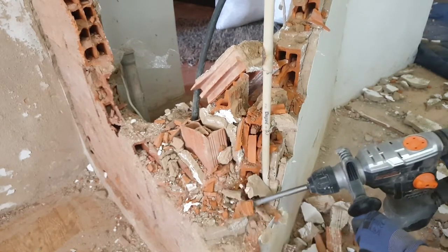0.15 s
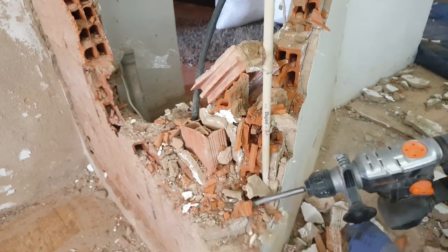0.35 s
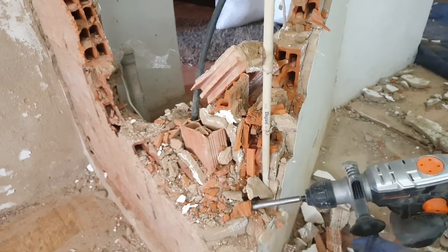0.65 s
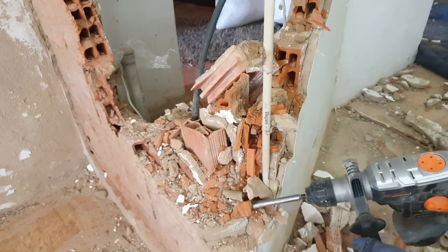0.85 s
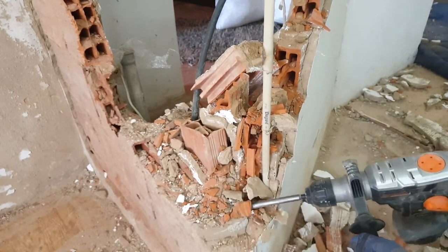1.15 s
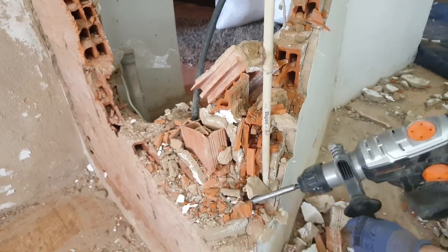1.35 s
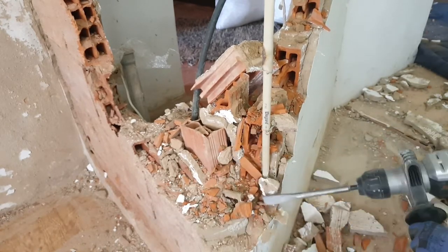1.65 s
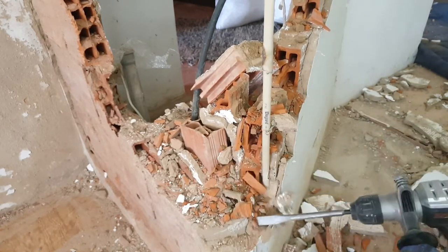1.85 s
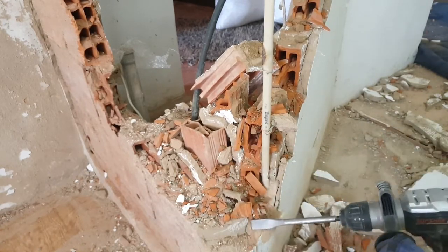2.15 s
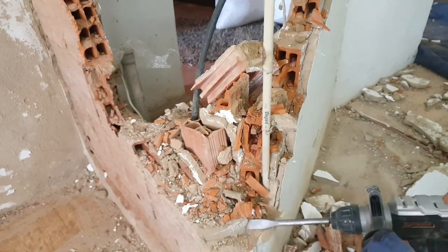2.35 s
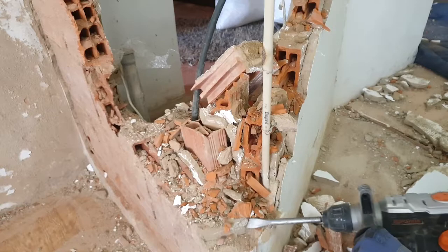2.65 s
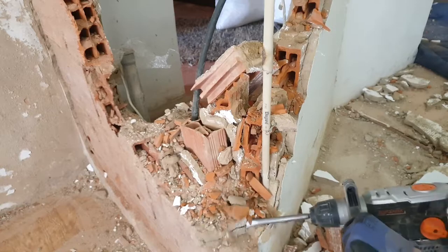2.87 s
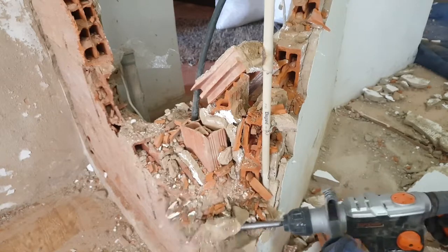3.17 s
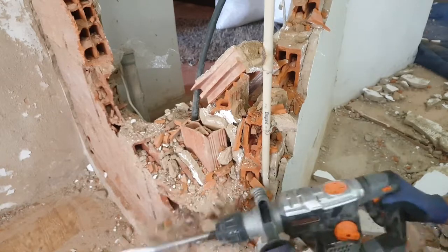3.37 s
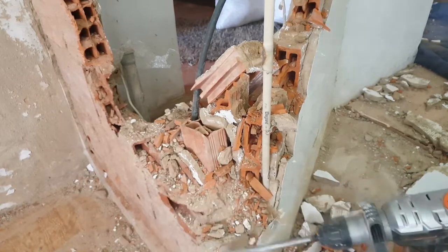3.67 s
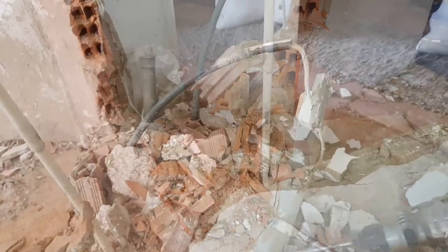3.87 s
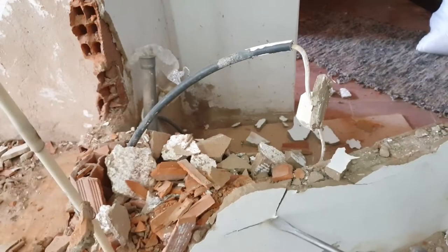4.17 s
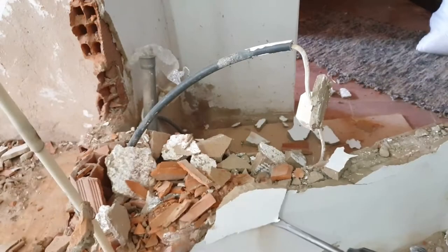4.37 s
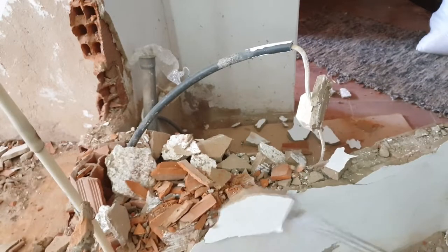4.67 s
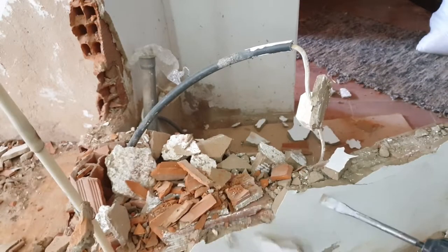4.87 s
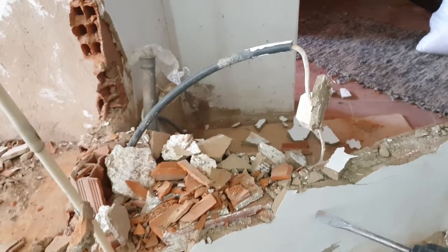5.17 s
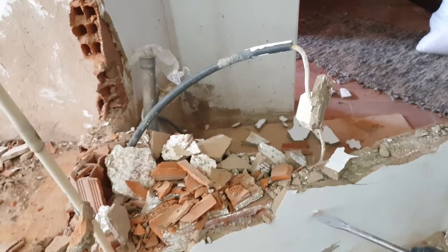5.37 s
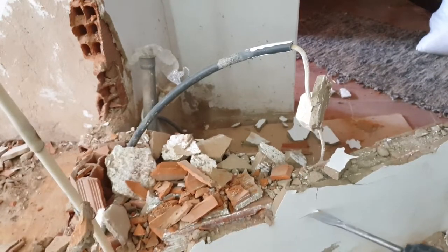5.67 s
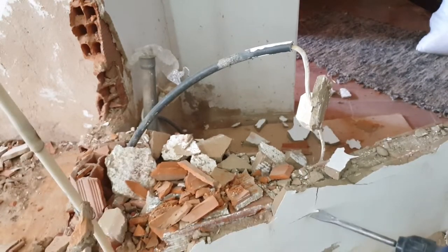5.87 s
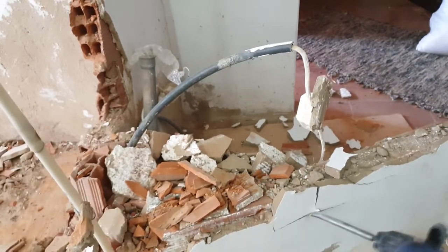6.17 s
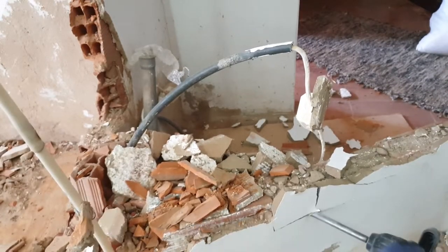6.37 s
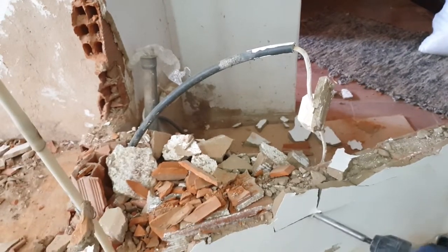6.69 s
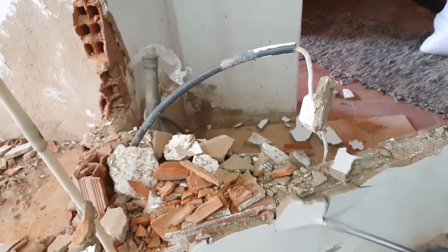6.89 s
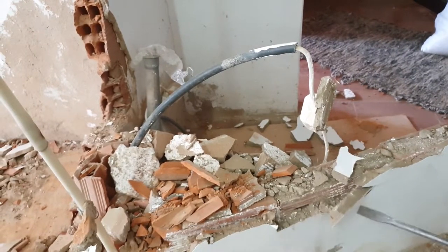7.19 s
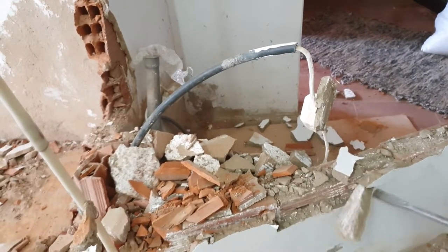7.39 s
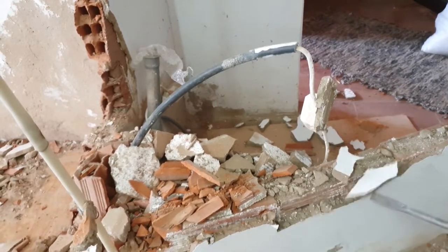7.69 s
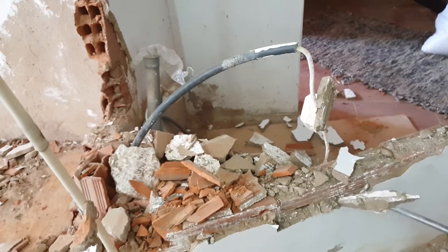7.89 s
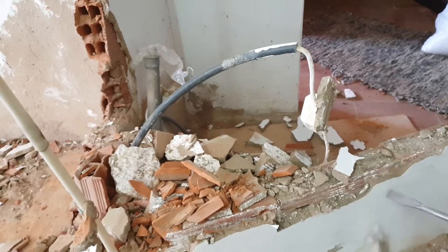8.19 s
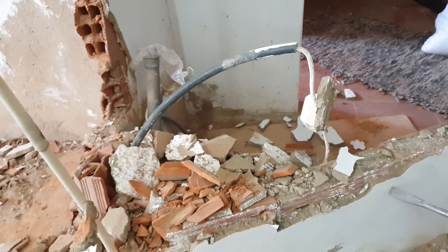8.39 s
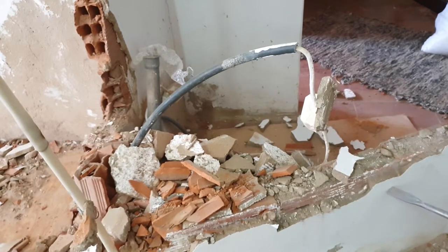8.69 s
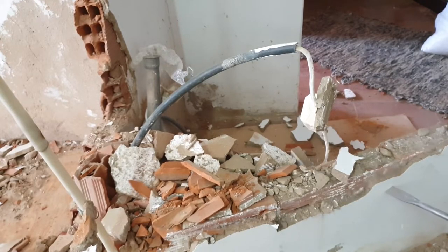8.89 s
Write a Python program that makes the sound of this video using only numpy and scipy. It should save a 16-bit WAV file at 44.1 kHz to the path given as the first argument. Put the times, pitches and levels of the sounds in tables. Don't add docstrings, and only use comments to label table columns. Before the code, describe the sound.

An electric rotary hammer with a steel chisel batters a hollow brick wall in separate bursts: fast metallic cracks, boxy wall boom and gritty crunch over a piercing motor whine and fan rush. Between bursts the whine slides down and loose pieces clack and crumble. Bare indoor room with short reverberation; close small stereo microphone, tool louder and brighter on the right.

```python
import sys
import numpy as np
from scipy import signal
from scipy.fft import rfft, irfft, next_fast_len
from scipy.io import wavfile
from scipy.ndimage import uniform_filter1d

SR = 44100
rng = np.random.default_rng(int(sys.argv[2]) if len(sys.argv) > 2 else 0)


def natural_amplitude(level_db):
    exponent = np.asarray(level_db, float) / 20
    return 10 ** exponent


def digitize_waveform(pressure):
    field = np.atleast_2d(pressure).T
    bounded = np.clip(field, -1, 1)
    quanta = np.round(bounded * 32767).astype(np.int16)
    wavfile.write(sys.argv[1], SR, quanta)


N = 398656

FULL_HZ, REST_HZ = 9850, 300

# on in s, off in s, full-speed whine in Hz, spin-up time constant in s,
# time the bit stays loaded after release in s.
PULLS = [
    (-.395, .521, 9833, .195, .124),
    (1.086, 1.544, 10819, .13, 0),
    (2.257, 3.003, 9891, .127, .189),
    (3.841, 4.353, 9828, .113, .105),
    (5.224, 6.239, 9849, .129, .143),
    (6.489, 6.714, 9410, .081, .047),
    (8.476, 9.2, 9800, .111, 0),
]
# time in s, seating on solid wall in dB, crushing of brick in dB.
BITE = [
    [(0, 0.5, 0.5), (.14, -0.5, -1.8), (.316, -1, 0.8), (.404, -9, -3.5), (.606, -3.5, -3.5),
     (.7, -13, -5.5)],
    [(2.375, 10, -14), (2.429, -15, 4.5), (2.729, 11, 0.5), (2.851, 4, -6.5), (2.985, -35, -3.5),
     (3.103, -5, .4), (3.2, -12, .4)],
    [(3.91, 6, -2.5), (3.968, -2, 6.5), (4.15, 3.5, 2), (4.226, -9.5, -6), (4.41, -1.5, 1.5),
     (4.52, 3.5, -21)],
    [(5.39, 1, 2), (5.46, -5, 4.5), (5.51, -.4, 6), (5.87, 4.5, -2.5), (6.316, -1.5, -2.5),
     (6.48, -0.5, -5.5), (6.624, 4, -1.3), (6.66, 1, -1.5), (6.72, -3, -7)],
    [(8.555, 8.5, 1), (8.721, -2, 1.5), (8.893, -3.5, -2), (9.04, 2, -1)],
]
# time in s, steel in dB, brick in dB.
SLOW = [(2.1949, -7, -28.5), (2.227, -4, -25.5), (2.2586, -6.5, -22), (2.2936, -12.5, -34),
        (2.321, -6, -23.5), (2.3434, -9.5, -34), (2.366, -12, -19.5), (3.23, -8, -41), (3.255, -8, -21.5),
        (3.3374, -27, -42), (3.8407, -22, -29), (3.8893, -8, -20), (5.2168, -12, -31), (5.271, -20, -25),
        (5.3088, -7, -22.5), (5.3322, -7, -18), (5.3568, -7.5, -16.5), (5.3792, -2, -15.5),
        (8.4766, -49, -52), (8.503, -30, -28.5), (8.54, -3, -15.5)]
# start in s, then change of the full-speed whine in dB.
LATER_PART = (3.85, -4)


def colour(x, points):
    hz, db = np.transpose(points)
    size = next_fast_len(x.shape[-1])
    f = np.maximum(np.arange(size // 2 + 1) * SR / size, 1)
    gain = natural_amplitude(np.interp(np.log(f), np.log(hz), db))
    return irfft(rfft(x, size) * gain, size)[..., :x.shape[-1]]


def unit(x):
    return x / np.sqrt(np.mean(x ** 2))


def noise():
    return rng.standard_normal(N)


def band(x, lo_hz, hi_hz):
    return signal.sosfilt(signal.butter(2, [lo_hz, hi_hz], "bandpass", fs=SR, output="sos"), x)


def train(s, size):
    out = np.zeros(N)
    np.add.at(out, np.clip((np.asarray(s) * SR).astype(int), 0, N - 1), size)
    return out


def fade(x, t60):
    return signal.lfilter([1], [1, -np.exp(-np.log(1000) / (t60 * SR))], x)


def ring(x, hz, t60):
    pole = np.exp(2j * np.pi * hz / SR - np.log(1000) / (t60 * SR))
    return signal.lfilter([0, pole.imag], [1, -2 * pole.real, abs(pole) ** 2], x)


def body(s, db, modes, scatter_db, rough=0):
    mix = rng.standard_normal((len(s), len(modes)))
    out = 0
    for k, (hz, mode_db, t60) in enumerate(modes):
        push = train(s, natural_amplitude(db + mode_db + scatter_db * mix[:, k]))
        if rough:
            push = fade(push, rough) * noise()
        out = out + ring(push, hz, t60)
    return out


def walk(rate):
    k = int(SR / rate)
    return unit(uniform_filter1d(uniform_filter1d(noise(), k), k))


def shifting(x, t60, rate, gap=0, count=3):
    t = np.arange(int(1.2 * t60 * SR)) / SR
    tails = rng.standard_normal((count, len(t))) * natural_amplitude(-60 * t / t60) * (t >= gap)
    share = np.array([walk(rate) for _ in tails])
    share = share / np.sqrt((share ** 2).sum(axis=0) * (tails ** 2).sum() / count)
    paths = signal.oaconvolve(x[None], tails, axes=1)[:, :N]
    return (share * paths).sum(axis=0)


def working():
    t = np.arange(N) / SR
    return sum(1. * (t >= bite[0][0]) * (t <= bite[-1][0]) for bite in BITE)


def later():
    return 1. * (np.arange(N) / SR > LATER_PART[0])


def noise_floor():
    # frequency in Hz, spectrum level in dB.
    floor_colour = [(59, -34), (100, 10), (277, 17), (970, -7), (1200, -2), (1720, 7), (3700, 6.5),
                    (16000, -44)]
    return unit(colour(rng.standard_normal((2, N)), floor_colour)) * natural_amplitude(-54)


def camera_shake():
    memory_s = 1.5
    recent_work = fade(working(), memory_s) * np.log(1000) / (memory_s * SR)
    level_db = -60.5 + recent_work * (8.5 + 9 * later())
    return natural_amplitude(level_db) * unit(band(noise(), 50, 109))


def air_puff():
    puff = (-8, 58, .1)
    return natural_amplitude(puff[0]) * ring(train([2.365], 1), *puff[1:])


def room(source):
    dull = natural_amplitude(-5.5) * colour(source, [(80, 0.5), (500, 5.5), (3000, -3), (16000, 1.5)])
    return [shifting(dull, .57, rate=2.56, gap=0.0044, count=2) for _ in "lr"]


def debris():
    # time in s, peak in dB, pitch in Hz, bright part in dB, t60 in s.
    pieces = [(3.121, -16, 341, -13, 0.051), (3.492, -24, 1640, -5, 0.15), (3.527, -13, 1430, -9, 0.03),
              (4.755, -25.5, 564, -15, 0.022), (4.997, -26.5, 2200, -7, 0.08),
              (5.005, -26.5, 312, -18, 0.025), (5.059, -33.5, 543, -14, 0.11),
              (5.11, -18.5, 560, -34, 0.08), (7.286, -21.5, 465, -27, 0.039), (7.361, -28, 780, -17, 0.058),
              (7.463, -56, 746, -8, 0.08), (7.631, -37, 633, -19, 0.15), (7.654, -32.5, 560, -20, 0.086),
              (7.708, -21, 764, -25, 0.046), (7.716, -19, 740, -14, 0.05), (8.309, -23.5, 642, -22, 0.18),
              (8.321, -20.5, 670, -13, 0.044), (8.388, -18, 320, -13, 0.023)]
    # time in s, level in dB.
    taps = [
        (7.361, -61),
        (7.716, -60),
        (8.309, -57),
        (8.387, -63),
    ]
    # frequency in Hz, level in dB, t60 in s.
    free_chisel = [(4000, -1, .13), (4450, -5, .05), (6100, -13, .1), (2150, -2, .05), (1500, -4, .06)]
    s, db, hz, bright_db, t60 = np.transpose(pieces)
    out = fade(train(s, natural_amplitude(db + bright_db + 3)), 0.013) * band(noise(), 2500, 13000)
    out += fade(train(s, natural_amplitude(db + 11.0)), 0.021) * band(noise(), 292, 2010)
    crumbs = band(noise() * natural_amplitude(4.0 * walk(150)), 200, 1100)
    out += fade(train(s, natural_amplitude(db - 13)), .35) * crumbs
    t = np.arange(4000) / SR
    for start, peak_db, pitch, decay_s in zip((s * SR).astype(int), db, hz, t60):
        for k, part_db in [(1, 3), (1.5, -3), (2.3, -6.5)]:
            decay_db = -60 * k * pitch / 320 * t / decay_s
            out[start:start + len(t)] += natural_amplitude(part_db + peak_db + decay_db) * np.sin(2 * np.pi * k * pitch * t)
    return out + body(*np.transpose(taps), free_chisel, scatter_db=1, rough=0.042)


def speed():
    friction, load, coast_s = 2324, 6823, 1.192
    t, hz, now = np.arange(N) / SR, np.zeros(N), 9000
    stages = []  # (start s, goal Hz, time constant s)
    for on, off, top, rise, loaded in PULLS:
        stages += [(on, top, rise), (off, -(friction + load) * coast_s, coast_s),
                   (off + loaded, -friction * coast_s, coast_s)]
    for (start, goal, lag), (end, *_) in zip(stages, stages[1:] + stages[-1:]):
        span = slice(*np.searchsorted(t, [start, end]))
        hz[span] = goal + (now - goal) * np.exp((start - t[span]) / lag)
        now = max(goal + (now - goal) * np.exp((start - end) / lag), REST_HZ)
    return np.maximum(hz, REST_HZ)


def motor_db(hz):
    facing_db = [-1, .6, -1, -2.5, -3.5, -4, -1]
    t, share = np.arange(N) / SR, hz / FULL_HZ
    pull = np.searchsorted(np.array(PULLS)[:, 0], t) - 1
    powered = t < np.array(PULLS)[pull, 1]
    spark_db = 14 * powered * np.clip(1 - share, 0, 1) ** 2
    extra_db = 2.5 * working() + np.array(facing_db)[pull] + spark_db
    fan = natural_amplitude(-28.5 + 34 * np.log10(share) + uniform_filter1d(extra_db, size=400))
    scrape = natural_amplitude(-52) * np.clip((hz - REST_HZ) / 900, .1, 1)
    return 20 * np.log10(np.hypot(fan, scrape))


def fan_air(bars, hz):
    # frequency in Hz, spectrum level in dB.
    air_colour = [(59, -78), (100, -46), (224, -24), (260, -10), (433, -10), (524, -5.5), (648, -6),
                  (2520, -1.5), (8640, -4.5), (10500, -18.5), (16000, -8)]
    air = unit(colour(noise(), air_colour)) * (1 + 0.12 * np.sin(2 * np.pi * bars / 24))
    jet_db = -22.5 + 23.9 * hz / 10000 - 6 * later()
    return air + band(noise(), 8500, 16000) * natural_amplitude(jet_db)


def commutator_whine(bars, hz):
    # multiple of the bar rate, level in dB.
    overtones = [(1.83, -13), (2.75, -14), (3.67, -15), (4.6, -17)]
    # bar rate in Hz, whine over the air in dB.
    radiation = [(1500, -11), (3000, -8), (4500, -7), (6800, -6), (8600, -3), (9800, -2), (10700, -1)]
    slope = np.gradient(hz) * SR
    coasting = uniform_filter1d(1. * (slope < -2500), size=2000)
    hard_start = uniform_filter1d(1. * (slope > 12000), size=2000)
    waver = walk(170)
    brush = 0
    for k, db in overtones:
        level = natural_amplitude(db + 5 * (hz < 2600) + 1.6 * walk(15))
        brush = brush + level * np.sin(k * (2 * np.pi * bars + .3 * waver)) * (k * hz < 9000)
    facing_db = LATER_PART[1] * later() * (hz > 9500) - 4 * hard_start
    whine_db = np.interp(hz, *np.transpose(radiation)) + facing_db + (1.8 + 1.0 * coasting) * walk(30)
    return brush + natural_amplitude(whine_db) * np.sin(2 * np.pi * bars + (.6 + .9 * coasting) * waver)


def motor(bars):
    hz = np.gradient(bars) * SR
    level = natural_amplitude(motor_db(hz) + 4.5 + 0.93 * walk(7.4))
    return level * (fan_air(bars, hz) + commutator_whine(bars, hz))


def blows(bars):
    # phase offset of the blows in turns, then steel, wall, crunch and thud in dB.
    bursts = [
        (.26, -21.5, -19, -28, -27),
        (.38, -19, -25, -31.5, -32.5),
        (.29, -17.5, -31.5, -26, -28.5),
        (-.18, -19.5, -34.5, -28, -30.5),
        (.31, -18.5, -31.5, -25, -24.5),
    ]
    seat_share = [0.02, 0.24, 0, 1]
    crush_share = [0.36, 0.67, 0.98, 0]
    slow_mix_db = [-2.5, -10.5, 0.5, -8]
    run_mix_db = [8.76, 5.64, 10.24, 1.55]
    share = np.gradient(bars) * SR / FULL_HZ
    crank = bars / 157 - .8 * (1 - share)
    s, steel_db, brick_db = np.transpose(SLOW)
    slow_thud_db = brick_db + 7 * (s > LATER_PART[0])
    slow_db = np.array([steel_db, brick_db, brick_db, slow_thud_db]).T + slow_mix_db
    rows = [np.c_[s, slow_db]]
    for (lag, *level_db), bite in zip(bursts, map(np.array, BITE)):
        at = np.flatnonzero(np.diff(np.floor(crank - lag)) > 0)
        at = at[(at >= bite[0, 0] * SR) & (at <= bite[-1, 0] * SR)]
        seat, crush = (np.interp(at / SR, bite[:, 0], column)[:, None] for column in bite.T[1:])
        levels = np.add(level_db, run_mix_db) + seat * np.array(seat_share) + crush * np.array(crush_share)
        weakening = np.where(share[at + 1] < share[at], 45, 8)
        levels[:, 0] += weakening * np.log10(share[at])
        rows.append(np.c_[at / SR, levels])
    return np.concatenate(rows).T


def wall_boom(s, wall_db, thud_db):
    # frequency in Hz, level in dB, t60 in s.
    wall_modes = [(245.3, -7, 0.1), (312, 5, 0.064), (426, 1.5, 0.051), (560, -10.5, 0.11),
                  (747, -1.5, 0.036), (1110, -11, .03), (1500, -74, 0.024)]
    thud_modes = [(132.6, 4, 0.1), (173.8, 3.6, 0.11)]
    boom = body(s + .001, wall_db - 6, wall_modes, scatter_db=1.5)
    thud = body(s + .001, thud_db - 7, thud_modes, scatter_db=1.5)
    return band(boom + thud, 118, 2400)


def brick_crunch(s, crunch_db, grit_chance, cell_chance):
    cells = shifting(train(s, natural_amplitude(crunch_db + 32 + 0.99 * cell_chance)), .07, rate=4.05)
    cells = np.where(later(), natural_amplitude(-1.5) * band(cells, 480, 2400), band(cells, 342, 1820))
    grit = noise() * natural_amplitude(2.5 * walk(900))
    grit = np.where(later(), band(grit, 600, 2800), band(grit, 350, 2000))
    return cells + fade(train(s, natural_amplitude(crunch_db - 4.5 + 2.0 * grit_chance)), .15) * grit


def steel_ring(s, steel_db, bounce_chance):
    # frequency in Hz, level in dB, t60 in s.
    steel_modes = [(12840, 2.5, 0.0079), (13400, -7.5, .008), (11460, -19.5, 0.0056), (9950, -8.5, 0.0055),
                   (7190, -8.5, 0.0047), (6680, -19, 0.0057), (5230, -8, 0.0051), (4400, -17, 0.0086),
                   (2780, -24.5, 0.031)]
    rebound = s + 0.0059 + .0012 * bounce_chance
    steel = body(s, steel_db - 11, steel_modes, scatter_db=2.0, rough=0.0053)
    steel = steel + body(rebound, steel_db - 29.5, steel_modes[:2], scatter_db=2.5, rough=0.0092)
    tick = train(s, natural_amplitude(steel_db - 2))
    crack = band(tick + fade(train(s, natural_amplitude(steel_db)), 0.02) * noise(), 5670, 18700)
    loose = band(noise(), 11400, 11800) + 1.7 * band(noise(), 12640, 13600)
    return steel + crack + fade(train(s, natural_amplitude(steel_db - 12)), 0.1) * loose


def hammer(bars):
    s, steel_db, wall_db, crunch_db, thud_db = blows(bars)
    chance = rng.standard_normal((4, len(s)))
    chance[:, :len(SLOW)] = 0
    wall = wall_boom(s, wall_db, thud_db)
    brick = brick_crunch(s, crunch_db, chance[2], chance[3])
    return wall + brick + steel_ring(s, steel_db + 1.2 * chance[0], chance[1])


def scene():
    # frequency in Hz, gain in dB.
    left_shadow = [(60, -26.5), (110, -2), (200, -1.5), (380, -4), (700, -7.5), (1290, -9.5), (2380, -11),
                   (4400, -12.5), (8120, -19), (15000, -16)]
    bars = np.cumsum(speed()) / SR
    source = debris() + motor(bars) + hammer(bars)
    wet = room(source)
    bass = signal.lfilter(*signal.butter(1, 500, fs=SR), source)
    scattered = shifting(source - bass, .03, rate=28.0, count=4)
    left = colour(np.roll(bass, shift=9) + scattered + .7 * wet[0] + .7 * wet[1], left_shadow)
    right = source + wet[1] + air_puff()
    mid, side = noise_floor()
    mid = mid + camera_shake()
    return np.array([left + mid + 0.18 * side, right + mid - 0.63 * side])


def band_limit(x):
    return signal.sosfilt(signal.butter(12, 16830, fs=SR, output="sos"), x)


def record(dry):
    # frequency in Hz, gain in dB.
    port = [(15, -13), (30, 0), (7600, 0.5), (8700, -7), (9600, -0.5), (12500, 0.5), (15000, -5)]
    top_cut = [(15750, 0), (15950, -32), (16700, -45)]
    rounded = np.tanh(1.03 * colour(dry, port)) / 0.88
    return band_limit(colour(rounded, top_cut))


dry = scene()
out = record(dry)
digitize_waveform(out)
```